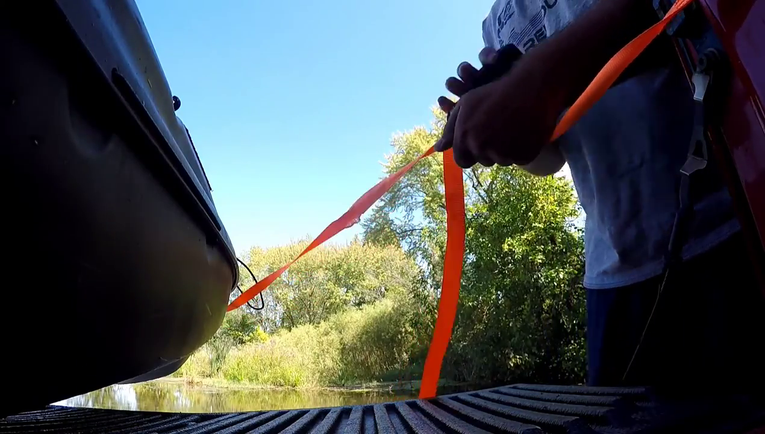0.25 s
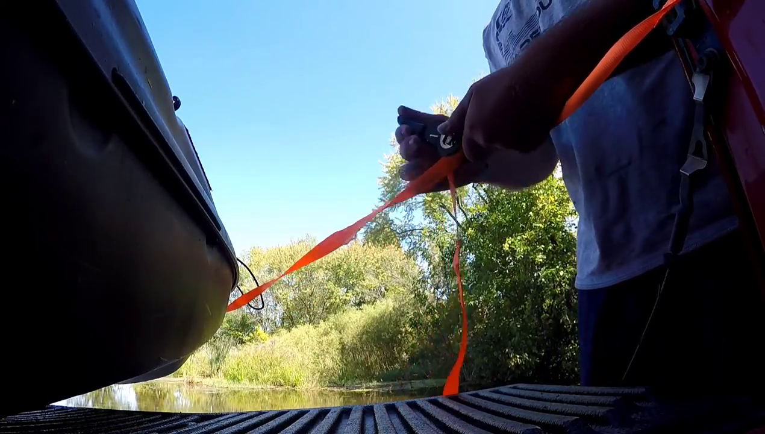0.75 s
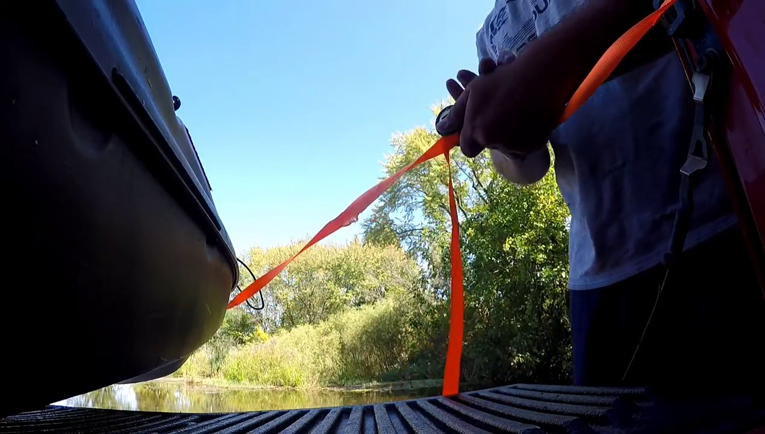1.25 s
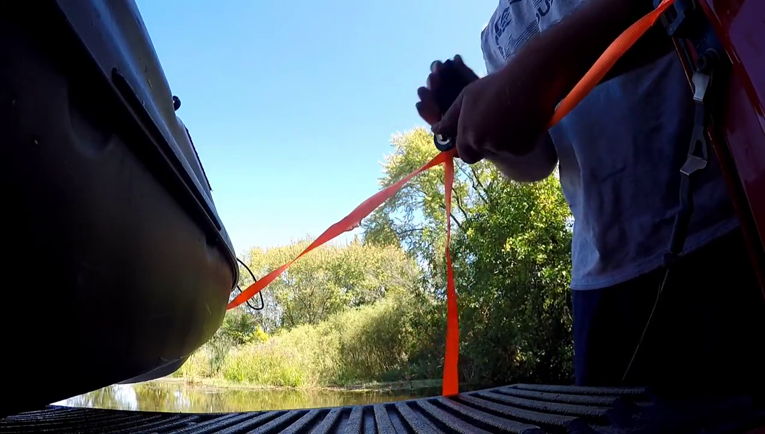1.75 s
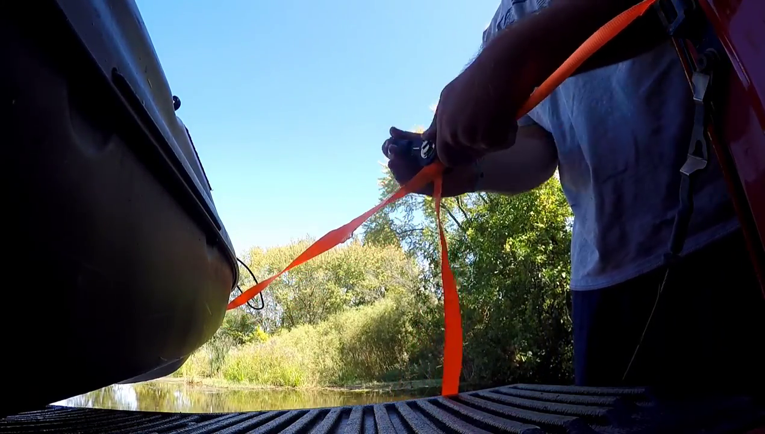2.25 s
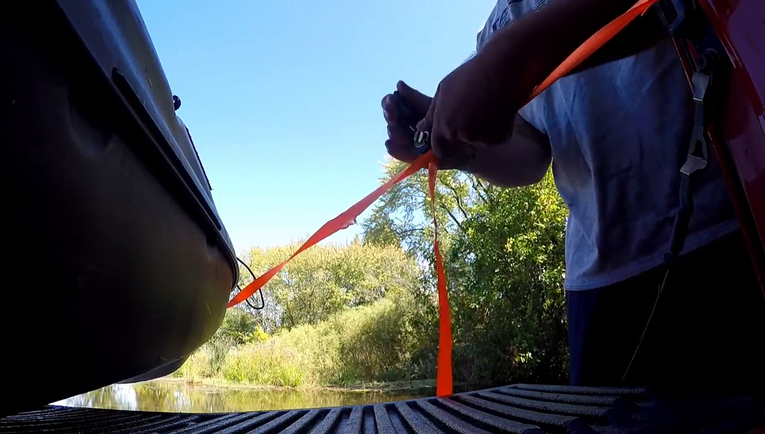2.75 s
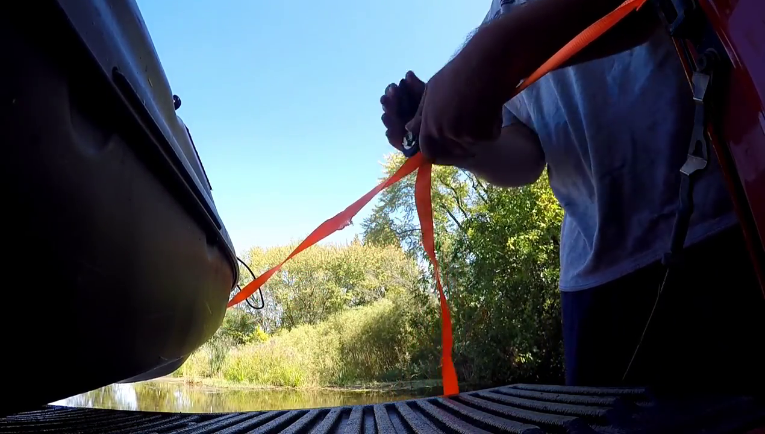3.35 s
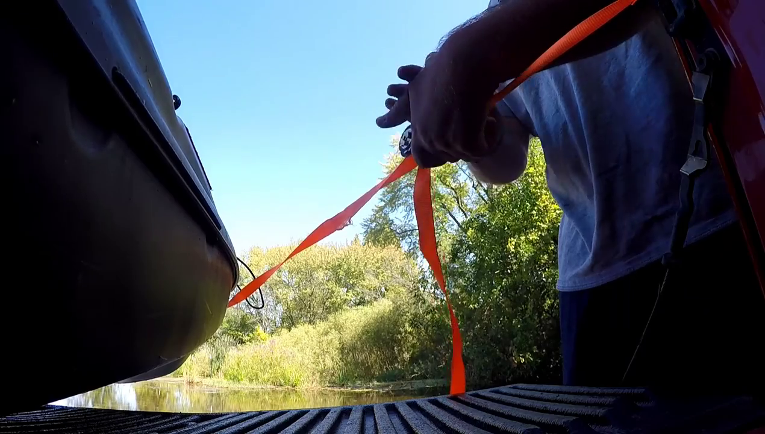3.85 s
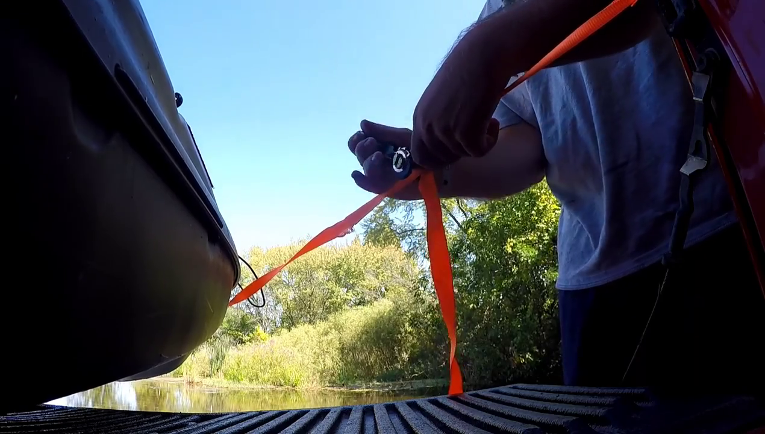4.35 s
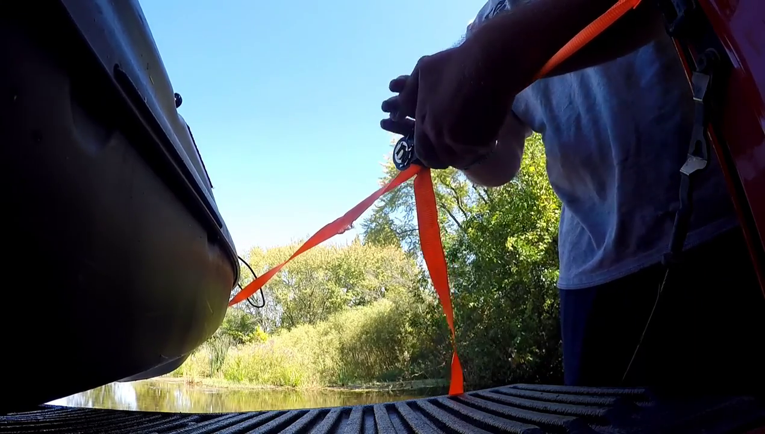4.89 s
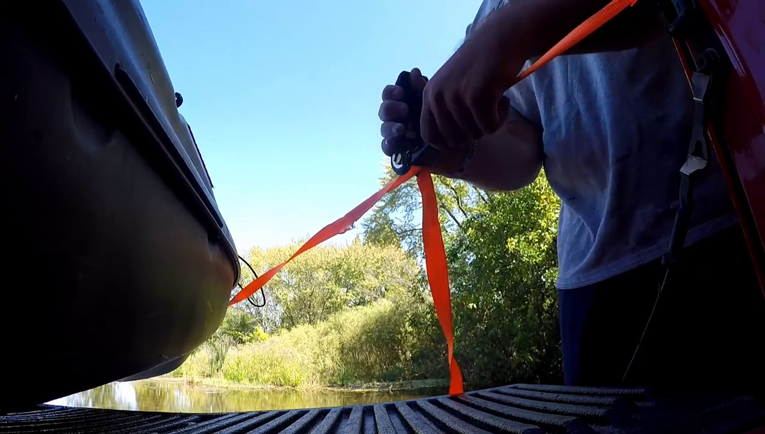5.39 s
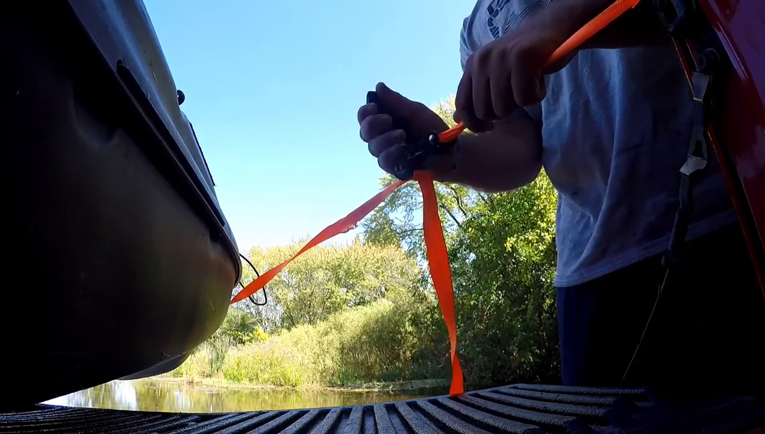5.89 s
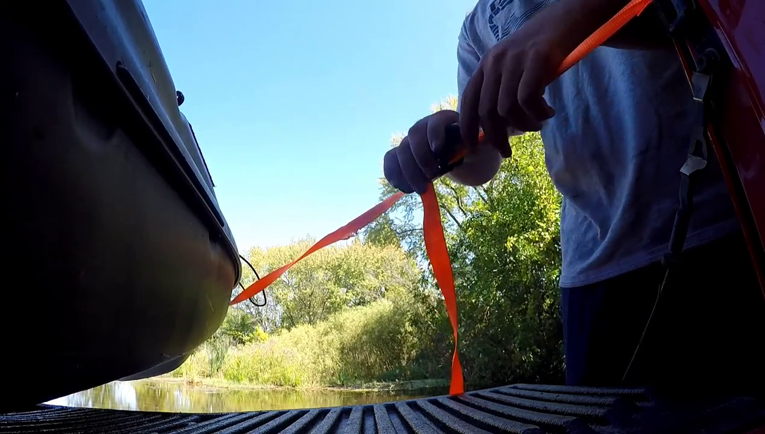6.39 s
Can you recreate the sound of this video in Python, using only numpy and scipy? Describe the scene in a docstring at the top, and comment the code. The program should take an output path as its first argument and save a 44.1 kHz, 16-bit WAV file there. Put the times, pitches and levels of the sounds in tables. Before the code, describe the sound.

Very close, bright steel ratchet clicks come in pairs, back swing then loaded pull, about three a second overall. Gritty webbing creaks lead into them, and each tug knocks a hollow plastic hull, increasingly boomy as the strap tightens. After a brief slip and pause, the hull judders with a squeaky clunk, the handle rattles, and final clicks lock. Behind lie a low distant engine, soft outdoor rumble and faint insects.

```python
"""Outdoors beside a pond, a ratchet strap is cranked over a hollow plastic boat in a pickup bed.
From the start a distant engine, a stack of low orders, changes gear while pulsed cricket tones sing over noise.
Stroke by stroke the pawl snaps, noise cracks over steel modes, and grains of webbing creak lead up to the clicks.
Each click tugs the hull's shell and air modes, boomier as the strap tightens; it slips briefly past 4 s.
Near 5.8 s the hull shifts with a juddering, squeaking clunk, the handle rattles and a last click locks."""
import sys
import numpy as np
from scipy import signal
from scipy.fft import rfft, irfft
from scipy.io import wavfile
from scipy.ndimage import uniform_filter1d, map_coordinates

SR = 44100
rng = np.random.default_rng(int(sys.argv[2]) if len(sys.argv) > 2 else 0)


def dump_mix(stems):
    """Bounce the given channels to the path in sys.argv[1] as a 16-bit WAV at rate SR."""
    frames = np.atleast_2d(stems).T  # one column per channel
    limited = np.clip(frames, -1, 1)  # hard clip at full scale
    pcm = np.round(limited * 32767).astype(np.int16)
    wavfile.write(sys.argv[1], SR, pcm)


N = 292250
TIME = np.arange(N) / SR


def amp(db):
    """Decibels to gain."""
    return 10 ** (np.asarray(db) / 20)


def fade(t, t60):
    """Exponential decay, 60 dB down at t60 seconds."""
    return np.exp(-np.log(1000) * t / t60)


def unit(x, span=None):
    """Scale to rms 1, as if all the energy lay within span seconds."""
    samples = span * SR if span else len(x)
    return x / np.sqrt(np.sum(x ** 2) / samples + 1e-18)


def curve(rows):
    """Join the columns of a table by straight lines in time."""
    s, *columns = np.transpose(rows)
    return [np.interp(TIME, s, column) for column in columns]


def add(track, s, sound):
    """Mix a sound into a track at s seconds."""
    i = max(int(s * SR), 0)
    track[i:i + len(sound)] += sound[:max(len(track) - i, 0)]


def noise(points, size):
    """Noise of rms 1, its spectrum drawn through (f/Hz, level/dB) points on a log frequency axis."""
    hz, db = np.transpose(points)
    f = np.maximum(np.fft.rfftfreq(size, 1 / SR), 1)
    gain = amp(np.interp(np.log(f), np.log(hz), db))
    return unit(irfft(rfft(rng.standard_normal(size)) * gain, size))


def band(x, hz, kind):
    """Second-order high-pass or low-pass."""
    sections = signal.butter(2, min(hz, SR / 2 - 1), kind, fs=SR, output="sos")
    return signal.sosfilt(sections, x)


def walk(rate):
    """Smooth random wander with a spread near 1, turning at rate steps per second."""
    steps = rng.standard_normal(1024)
    return map_coordinates(steps, [TIME * rate], order=3, mode="wrap")


def ring(modes, t, scatter_db, detune):
    """Sum of decaying modes; each blow weights and tunes them a little anew."""
    hz, db, t60 = (column[:, None] for column in np.transpose(modes))
    size, shift, phase = rng.standard_normal((3, len(modes), 1))
    tones = np.sin(2 * np.pi * (hz * (1 + detune * shift) * t + phase))
    return np.sum(amp(db + scatter_db * size) * fade(t, t60) * tones, axis=0)


# strap tension: t/s, tension (0 slack to 1 taut)
STRAP_TENSION = [(0, 0.11), (4.4, 1)]


def loaded(s, slack_taut):
    """Value at s seconds of something that follows the strap tension from slack to taut."""
    slack, taut = slack_taut
    return slack + (taut - slack) * np.interp(s, *np.transpose(STRAP_TENSION))


HANG_S, HANG_GROWTH = .0056, 4.05  # hang of a slack pawl, and how many times longer when taut


def hang(s):
    """Seconds between a loaded pawl breaking free and snapping home; tension stretches it."""
    return HANG_S * HANG_GROWTH ** loaded(s, (0, 1))


# steel buckle modes: f/Hz, relative level/dB, t60/s
BUCKLE_MODES = [(2710, -19, 0.028), (3210, -4, 0.023), (3450, -7, 0.041), (4470, -9.5, 0.064),
                (4980, 1.5, 0.02), (5030, -26, 0.0062), (5980, 8.5, 0.0098), (6300, 3.5, 0.014),
                (7230, 3.5, 0.0095), (7440, -3.5, 0.0064), (8120, -0.5, 0.014), (10400, 2, 0.0096),
                (11950, -6.5, 0.023), (14050, -3.5, 0.0096)]
# crack of steel on steel: f/Hz, relative level/dB
STEEL_CRACK = [(300, -14), (1500, -4), (2700, -0.5), (4000, 3), (5200, 4), (7000, 1.5), (9000, -1),
               (12500, -6.5), (15000, -4.5)]


def snap(ring_hz, top_db, focus_db=7, focus_width=0.016, patchy_db=3.5, strike_t60=0.016,
         buzz_db=-12, buzz_t60=0.08, pawl_db=0, pawl_t60=0.011, crack_db=3, bounce_db=-3,
         usual_top_db=-17):
    """Steel on steel: a crack that buzzes out, a short pawl note, buckle modes near it, one bounce."""
    t = TIME[:2048]

    def favour(hz):
        """Lift in dB for modes close to ring_hz."""
        return focus_db * np.exp(-(np.log(hz / ring_hz) / focus_width) ** 2)

    modes = [(hz, db + favour(hz), t60) for hz, db, t60 in BUCKLE_MODES]
    buckle = ring(modes, t, scatter_db=2.0, detune=0.03)
    pawl = np.sin(2 * np.pi * ring_hz * t) * fade(t, pawl_t60) * (1 - fade(t, pawl_t60))

    # a patchy spectrum makes every crack a little different
    grid = np.linspace(300, 15500, 32)
    colour = np.interp(grid, *np.transpose(STEEL_CRACK)) + patchy_db * rng.standard_normal(len(grid))
    crack_envelope = fade(t, strike_t60) + amp(buzz_db) * fade(t, buzz_t60)
    crack = noise(np.c_[grid, colour], len(t)) * crack_envelope

    sound = unit(buckle) + amp(pawl_db) * unit(pawl) + amp(crack_db) * unit(crack)
    add(sound, rng.uniform(.001, .0028), amp(bounce_db) * unit(crack))

    # harder contact is brighter; the flipped sign keeps the bands from cancelling at the crossover
    hardness = amp(np.clip(2.1 * (top_db - usual_top_db), -7, 6))
    sound = band(sound, 9500, "low") - hardness * band(sound, 9500, "high")
    return unit(sound * np.minimum(t / .0005, 1), span=.003)


# In the click tables levels are relative, ring is the favoured f/Hz,
# and brightness/dB steers the treble above 9500 Hz (-17 is neutral).
# back swing, the pawl climbs a tooth and drops: t/s, level/dB, ring f/Hz, brightness/dB, climb/s, tug level/dB
TOOTH_DROPS = [(0.3261, -3.5, 5150, -7, 0.011, 1), (1.1136, 1, 5960, -3, 0.08, -4),
               (1.1572, 0, 5000, -8, .04, -2), (1.8191, 1, 6500, -19.5, 0.087, -2),
               (1.8624, 0, 4960, -16.5, 0.019, 7.5), (2.4409, -1.5, 4540, -16, 0.072, -2),
               (2.4873, 1, 5290, -18, 0.03, 0.5), (3.0881, -1, 5680, -8, 0.077, 0),
               (3.1307, -4, 4770, -18, 0.029, -1), (3.762, -1, 4700, -6, 0.073, -14),
               (3.8073, 1.5, 5010, 4, .04, -1), (4.8219, -3.5, 6780, -18, 0.083, -6),
               (4.8718, 0, 6800, -5, 0.061, 3), (6.262, 2.5, 4844, -3, 0.016, 3)]
# the handle turns round and the pawl seats dully: t/s, level/dB, ring f/Hz, tug level/dB
PAWL_CATCHES = [(0.4507, -13.5, 6800, 0.5), (0.6533, -13, 4770, -7), (1.4187, -12, 4930, -0.5),
                (2.0751, -11, 5580, 1), (2.6962, -11.5, 4940, 2.5), (3.322, -10.5, 6500, 3),
                (4.0211, -10.5, 5566, 3), (5.1571, -16.5, 4850, -2), (6.3895, -9, 5280, 4)]
# power stroke, the loaded wheel gains a tooth: t/s, level/dB, ring f/Hz, brightness/dB, tug level/dB
LOADED_PULLS = [(0.7089, -1.5, 5750, -32, -3.5), (0.7612, -1.5, 5400, -25, 0.5),
                (1.48, -0.5, 6420, -17.5, 1.5), (1.5444, -1.5, 6900, -16.5, 0.5),
                (2.1285, -4, 7180, -6, -2), (2.1866, -4.5, 6530, -18.5, -1), (2.7756, -3.5, 3550, -15.5, 3),
                (2.8594, -4.5, 5960, -8, 1), (3.4194, -3.5, 6665, -15.5, 2), (3.5127, -1, 7030, -28, 0),
                (4.1645, -2.5, 3110, -20, 3), (4.405, -6, 6580, -16, 0)]
# the loose handle rattles when moved or jolted: t/s, level/dB, ring f/Hz, brightness/dB
HANDLE_RATTLES = [(0.184, -23.5, 4160, -34), (0.4315, -16, 4700, -17), (2.3711, -18.5, 7200, -29),
                  (3.6596, -23, 3907, -31), (4.465, -10.5, 5804, -33), (4.667, -30, 5750, -29),
                  (5.8714, -15, 6440, -14), (5.8867, -6, 6560, -16), (5.898, -5, 7400, -12),
                  (6.0277, -26, 6700, -24), (6.13, -31, 4520, -30), (6.36, -13.5, 4000, -17)]
# leading squeal for a click of level 0 dB, before the scrape's own square-law loudness
TOOTH_SCRAPE_DB, CATCH_SCRAPE_DB, PULL_SCRAPE_DB, TICK_SCRAPE_DB = -17, -11.5, -27, -28.5
CATCH_TOP_DB = -28  # brightness of a catch
TIP_S, TIP_DB, TIP_TOP_DB = 0.0045, -13.5, -10  # tooth-tip tick: lead, level against the drop, brightness
SWING_S, SKIM_DB = .06, -6  # teeth this close share a swing, and the pawl only skims the second tip
BREAK_DB, BREAK_TOP_DB = (-16, -12.5), -21.5  # breaking-free tick: level (slack, taut), brightness
# one more skid: share of the hang left, level (slack, taut), ring, brightness
SKID_SHARE, SKID_DB, SKID_HZ, SKID_TOP_DB = .33, (-15.5, -7), 3680, -14


def contacts():
    """Every steel contact of the strokes: t/s, level/dB, ring f/Hz, brightness/dB, scrape level/dB."""
    previous = -np.inf
    for s, db, hz, top_db, *_ in TOOTH_DROPS:
        skim_db = SKIM_DB if s - previous < SWING_S else 0
        yield s - TIP_S, db + TIP_DB + skim_db, hz, TIP_TOP_DB, TICK_SCRAPE_DB
        yield s, db, hz, top_db, TOOTH_SCRAPE_DB + skim_db / 2
        previous = s
    for s, db, hz, _ in PAWL_CATCHES:
        yield s, db, hz, CATCH_TOP_DB, CATCH_SCRAPE_DB
    for s, db, hz, top_db, _ in LOADED_PULLS:
        yield s - hang(s), loaded(s, BREAK_DB), hz, BREAK_TOP_DB, TICK_SCRAPE_DB
        skid_s = s - SKID_SHARE * hang(s)
        yield skid_s, loaded(s, SKID_DB), SKID_HZ, SKID_TOP_DB, TICK_SCRAPE_DB
        yield s, db, hz, top_db, PULL_SCRAPE_DB
    for s, db, hz, top_db in HANDLE_RATTLES:
        yield s, db, hz, top_db, TICK_SCRAPE_DB


def ratchet(snap_db=-9, drag_s=0.0062, rasp_db=-11):
    """A short squeal as the pawl rides off its tooth leads each snap; light taps have almost none."""
    out = np.zeros(N)
    for s, db, ring_hz, top_db, drag_db in contacts():
        add(out, s, amp(db + snap_db) * snap(ring_hz, top_db))
        squeal_band = [(ring_hz / 1.4, -40), (ring_hz / 1.1, 0), (ring_hz * 1.1, 0), (ring_hz * 1.4, -40)]
        squeal = noise(squeal_band, size=1024)
        rasp = amp(rasp_db) * noise(STEEL_CRACK, size=1024)
        scrape = (squeal + rasp)[:int(drag_s * SR)]
        swell = np.sqrt(np.linspace(0, 1, len(scrape)))
        # doubling the decibels makes the scrape grow with the square of the snap
        add(out, s - drag_s, amp(2 * db + drag_db) * scrape * swell)
    return out


CLIMB_DB, QUICK_CLIMB_S = -31.5, 0.034  # rasp of a quick climb; a slower one is softer in proportion
TAKE_UP_S, TAKE_UP_DB = 0.024, -42  # creak before the pawl seats
LOAD_CREAK_DB = (-33, -31)  # creak while the loaded pawl hangs (slack, taut)


def creaks():
    """The rubbing that leads up to each click: end t/s, length/s, level/dB."""
    for s, *_, climb_s, _ in TOOTH_DROPS:
        yield s, climb_s, CLIMB_DB - 20 * np.log10(max(climb_s / QUICK_CLIMB_S, 1))
    for s, *_ in PAWL_CATCHES:
        yield s, TAKE_UP_S, TAKE_UP_DB
    for s, *_ in LOADED_PULLS:
        yield s, hang(s), loaded(s, LOAD_CREAK_DB)


def webbing(grain_spread_db=5, grain_rate=420, grain_t60=.008):
    """Gritty stick-slip ticks, in uneven scratches, that grow towards each click."""
    effort = np.zeros(N)
    for end, length, db in creaks():
        add(effort, end - length, amp(db) * np.linspace(.6, 1.1, max(int(length * SR), 1)))
    slip_size = amp(grain_spread_db * np.minimum(rng.exponential(size=N), 2))
    slips = (rng.random(N) < grain_rate / SR) * slip_size  # grain_rate is slips per second
    grains = signal.fftconvolve(slips, fade(TIME[:1024], grain_t60))[:N]
    rasp = noise([(300, 4), (1500, -1.5), (3000, 3.5), (5200, 3.5), (7500, -3.5), (10000, -14), (15000, -21)], N)
    grip = unit(amp(4 * np.minimum(walk(130), 1.3)))
    return effort * grip * rasp * unit(unit(grains) + 0.68)  # 0.68 keeps some rasp between the grains


def truck_bed(x, echo_s=.0072, echo_db=-13, tail_db=-10.5, tail_t60=0.036):
    """Hull and bed throw back one close echo and a short diffuse tail."""
    t = TIME[:6000]
    tail = band(rng.standard_normal(len(t)), 18600, "low")
    tail = tail * fade(t, tail_t60) * (1 - fade(t, 0.023))
    response = amp(tail_db) * unit(tail, span=1 / SR)
    response[0] += 1  # direct sound
    response[int(echo_s * SR)] += amp(echo_db)
    return signal.fftconvolve(x, response)[:N]


# air in the hollow hull: f/Hz, relative level/dB, t60/s
HULL_AIR_MODES = [(135.4, -15.5, 1), (180, -4, 0.54), (198.1, -5, 0.59), (217.9, 4.5, 0.2),
                  (264.7, -8.5, 0.67), (281, -15, 1), (314, -22, 0.71)]
# plastic shell: f/Hz, relative level/dB, t60/s
SHELL_MODES = [(402, -0.5, 0.48), (446, 7.5, 0.22), (484.4, -1, 0.38), (545, 0.5, 0.31), (593.5, 1.5, 0.31),
               (602, -19.5, 0.66), (713, 5.5, 0.2), (771, 2, 0.15), (920, -9, 0.6), (990, 0, 0.27),
               (1080, -11, 0.42), (1222, 4.5, 0.19), (1320, 17.5, 0.032), (1530, -53, 0.037),
               (1670, -16, 0.063), (1749, 6.5, 0.067), (1768, -35, 0.035), (1990, -12, 0.1)]
# dense rings of the shell, as noise: f/Hz, relative level/dB
SHELL_DENSE_RINGS = [(100, 21), (300, 9.5), (600, 4.5), (1100, 5.5), (1800, -6.5), (2600, -8.5),
                     (5000, -17.5), (12000, -33)]


def hull_blow(knock_db, boom_db, rise_s, wash_db, wash_t60):
    """One blow: the shell knocks differently at each spot, the air inside always booms alike."""
    t = TIME[:15000]
    wash = unit(noise(SHELL_DENSE_RINGS, len(t)) * fade(t, wash_t60))
    knock = unit(ring(SHELL_MODES, t, scatter_db=2.5, detune=0.0053))
    shell = unit(knock + amp(wash_db) * wash, span=0.036)
    boom = sum(amp(db) * fade(t, t60) * np.sin(2 * np.pi * hz * t) for hz, db, t60 in HULL_AIR_MODES)
    boom = unit(boom, span=0.043)
    return (amp(knock_db) * shell + amp(boom_db) * boom) * (1 - fade(t, rise_s))


# tug of each click on the hull, relative: (knock level/dB slack, taut), (boom level/dB slack, taut)
TOOTH_PULL_ON_HULL = ((-40, -27), (-66, -27.5))
CATCH_PULL_ON_HULL = ((-34, -31.5), (-71, -31.5))
STROKE_PULL_ON_HULL = ((-21.5, -24), (-52, -15.5))
# the hull slides across the bed: t/s, length/s, relative knock level/dB, relative boom level/dB,
# squeak f/Hz, squeak level/dB against the knock
HULL_SLIDES = [(4.462, 0.0092, -29, -29, 1110, 8.5), (5.828, .01, -38.5, -35, 900, 5),
               (5.844, 0.043, -16.5, -17, 1740, -8), (5.885, .055, -17, -15, 1750, -14)]
# plastic scuffing on the bed: f/Hz, relative level/dB
BED_SCUFF = [(250, -10), (430, 17.5), (620, 11), (900, 15.5), (1450, -5), (1650, 12.5), (1830, 8.5),
             (2100, -4.5), (2800, -3), (4000, -19), (12000, -45)]
TUG_LAG_S = 0.00352  # the tug runs down the strap
JUDDER_S, JUDDER_JITTER_S = 0.017, 0.000927  # stick-slip period of a slide and its scatter
BRAKE_DB = -14.5  # the judder weakens towards this by the end of a slide


def hull(tug_db=-2, scuff_db=-5, scuff_t60=0.13, squeak_t60=.1, lurch_db=-8, lurch_rise_s=0.053,
         judder_boom_db=-9):
    """Strap tugs sound the hull, boomier as it tightens; slides boom, judder, scuff and squeak."""
    out, t = np.zeros(N), TIME[:8192]
    tugs = ((TOOTH_DROPS, TOOTH_PULL_ON_HULL), (PAWL_CATCHES, CATCH_PULL_ON_HULL),
            (LOADED_PULLS, STROKE_PULL_ON_HULL))
    for clicks, (knock, boom) in tugs:
        for s, *_, db in clicks:
            blow = hull_blow(loaded(s, knock), loaded(s, boom), rise_s=0.02, wash_db=6.5, wash_t60=0.2)
            add(out, s + TUG_LAG_S, amp(tug_db + db) * blow)

    for start, length, knock_db, boom_db, squeak_hz, squeak_db in HULL_SLIDES:
        lurch = hull_blow(knock_db + lurch_db, boom_db, rise_s=lurch_rise_s, wash_db=12.0, wash_t60=0.11)
        add(out, start, lurch)
        squeak_band = [(squeak_hz / 1.3, -45), (squeak_hz / 1.08, 0),
                       (squeak_hz * 1.08, 0), (squeak_hz * 1.3, -45)]
        for age in np.arange(0, length, JUDDER_S):
            s = start + age + JUDDER_JITTER_S * rng.standard_normal()
            db = knock_db + BRAKE_DB * (age / length) ** 4
            add(out, s, hull_blow(db - 4.0, db + judder_boom_db, rise_s=0.01, wash_db=2.5, wash_t60=0.18))
            scuff = unit(noise(BED_SCUFF, len(t)) * fade(t, scuff_t60), span=0.035)
            squeak = unit(noise(squeak_band, len(t)) * fade(t, squeak_t60), span=0.0034)
            add(out, s, amp(db) * (amp(scuff_db) * scuff + amp(squeak_db) * squeak))
    return out


# distant engine: t/s, cycle rate f/Hz, relative level/dB
ENGINE_RUN = [(0, 20.8, -31.5), (.55, 20.3, -33.5), (.82, 12, -24), (1.05, 16, -30.5), (1.35, 17.5, -27),
              (3.4, 19.3, -27), (4.25, 20, -26.5), (4.8, 14.5, -35.5), (5.1, 16.8, -31.5), (5.7, 17.1, -26),
              (6.63, 16.1, -34)]
# engine orders: multiple of the cycle rate, relative level/dB
ENGINE_ORDER_LEVELS = [(2, -7), (3, -5), (4, 1.5), (5, 2), (6, -11), (7, -3.5), (8, -19), (9, -0.5),
                       (10, -20), (11, -7.5), (12, -14.5), (13, -16.5), (14, -20)]
# exhaust resonances: centre f/Hz, width/Hz, lift/dB
EXHAUST_RESONANCES = [(74, 120, 5.5), (169.4, 26, 7.5)]
COAST_HZ_PER_S, COAST_DB = 4.1, -9  # slowing this fast is fully off throttle, and cuts the upper orders


def engine(wobble=0.0012, flutter_db=1.2):
    """Low orders swell as they cross exhaust resonances; the upper ones dull when the engine slows."""
    hz, db = curve(ENGINE_RUN)
    slowing = uniform_filter1d(-np.gradient(hz) * SR, size=6000)
    coasting = np.clip(slowing / COAST_HZ_PER_S, 0, 1)
    phase = 2 * np.pi * np.cumsum(hz * (1 + wobble * walk(11))) / SR
    out = np.zeros(N)
    for k, order_db in ENGINE_ORDER_LEVELS:
        pipe_db = sum(lift / (1 + (2 * (k * hz - centre) / width) ** 2)
                      for centre, width, lift in EXHAUST_RESONANCES)
        dull_db = COAST_DB * coasting * (k > 6)
        level_db = order_db + pipe_db + dull_db + flutter_db * walk(5.5)
        out += amp(level_db) * np.sin(round(k) * phase + 2 * np.pi * rng.random())
    return amp(db - 1.5) * unit(out)


# nearer crickets: f/Hz, downward sweep of a pulse/Hz, starting level/dB, pulses per s,
# fading/dB per s (negative grows)
NEAR_CRICKETS = [(6610, 300, -53, 56, 1.6), (3880, 220, -69, 150, -0.5)]
# far insect chorus: f/Hz, relative level/dB
FAR_CHORUS = [(3000, -50), (3800, 12.5), (4400, -24), (5700, -5), (6400, 3), (7000, 12), (7600, 2.5),
              (8600, -5), (9400, -15), (15000, -35)]


def crickets(chorus_db=-57):
    """Each wing stroke is a short falling tone, blurred by the bushes, over a far chorus."""
    out = amp(chorus_db + walk(1.0)) * noise(FAR_CHORUS, N)
    for hz, sweep_hz, db, rate, fading_db in NEAR_CRICKETS:
        stroke = np.cumsum(rate * (1 + .01 * walk(5))) / SR % 1  # 0 to 1 through each pulse
        phase = 2 * np.pi * np.cumsum(hz + sweep_hz * (.5 - stroke)) / SR
        # random sine and cosine parts blur the tone
        tone = np.sin(phase) * (1 + .5 * walk(110)) + .5 * walk(110) * np.cos(phase)
        level = amp(db - fading_db * TIME + walk(2.27))
        out = out + level * unit(tone * np.sin(np.pi * stroke))
    return out


# outdoor rumble and air: f/Hz, relative level/dB
OUTDOOR_AIR = [(5, -32), (15, 0), (35, -3), (62, 5.5), (110, -4), (200, -3.5), (320, -20.5), (600, -24.5),
               (1000, -22.5), (1350, -23), (2200, -39), (3100, -40.5), (5000, -38), (8000, -38),
               (10000, -48), (15000, -48)]
# swells of the rumble: t/s, relative level/dB
RUMBLE_SWELLS = [(0, -37), (.8, -37), (2.2, -31), (4.1, -25.5), (5.4, -36.5), (6.63, -28)]


def outdoors(air_db=-34, split_hz=300):
    """Shaped noise, split in two: a low rumble swells and flutters under nearly steady far-off air."""
    air = noise(OUTDOOR_AIR, N)
    rumble_db, = curve(RUMBLE_SWELLS)
    rumble = amp(rumble_db - 1 + walk(7.3)) * band(air, split_hz, "low")
    far_air = amp(air_db + .5 * walk(3.43)) * band(air, split_hz, "high")
    return rumble - far_air  # flipped so the halves do not cancel at the split


def scene():
    """Buckle and strap close by, the boat beside them, the landscape behind; all in the centre."""
    strap = truck_bed(ratchet() + webbing())
    mono = strap + hull() + engine() + crickets() + outdoors()
    return np.array([mono, mono])


TOP_HZ = 15400


def record(dry):
    """Hard clipping flattens the sharpest peaks, then a steep low-pass cuts the top."""
    clipped = np.clip(dry, -1, 1)
    return signal.sosfilt(signal.ellip(8, .2, 70, TOP_HZ, fs=SR, output="sos"), clipped)


dry = scene()
out = record(dry)
dump_mix(out)
```